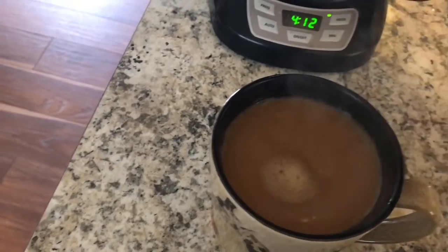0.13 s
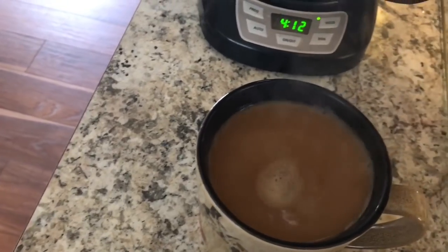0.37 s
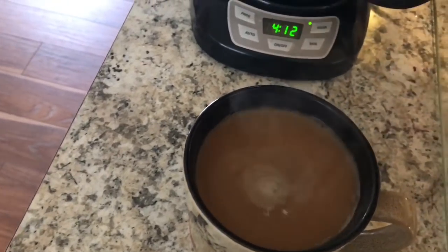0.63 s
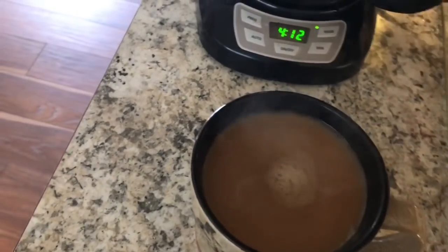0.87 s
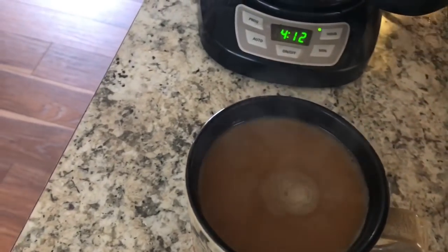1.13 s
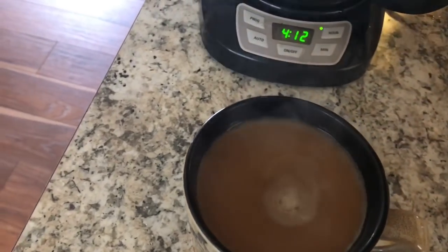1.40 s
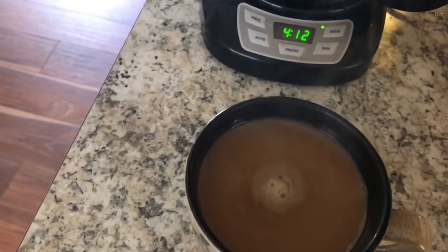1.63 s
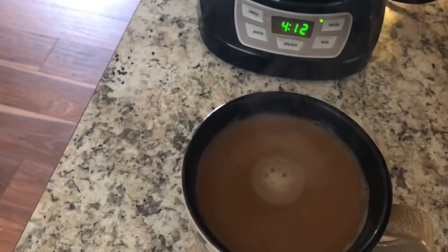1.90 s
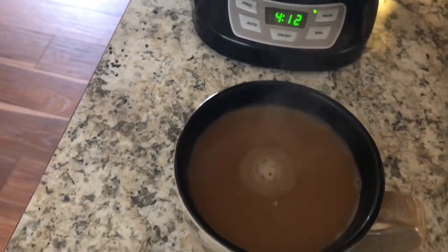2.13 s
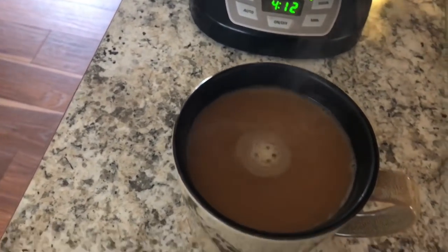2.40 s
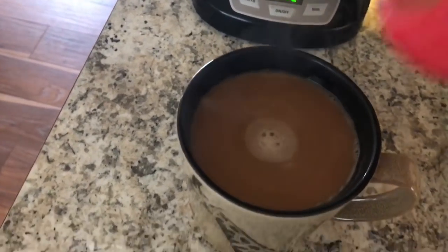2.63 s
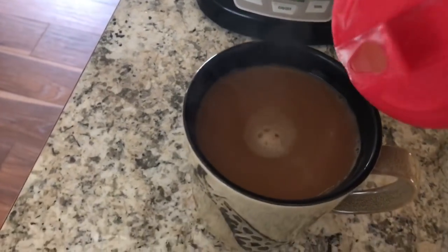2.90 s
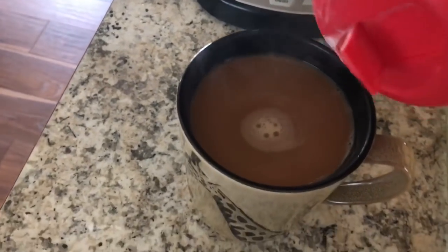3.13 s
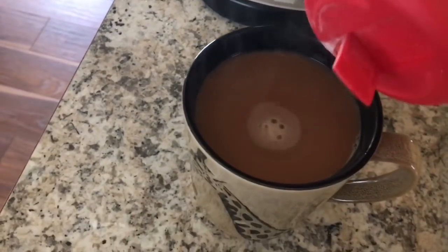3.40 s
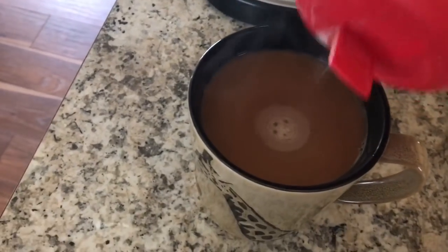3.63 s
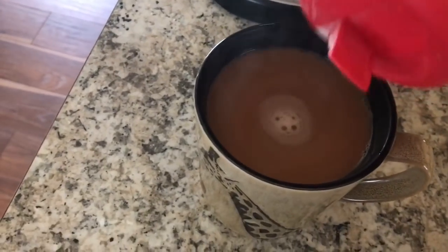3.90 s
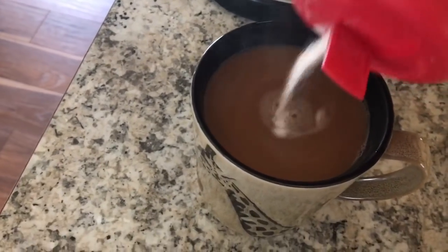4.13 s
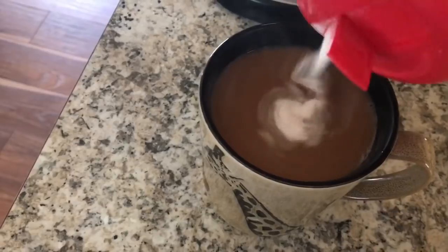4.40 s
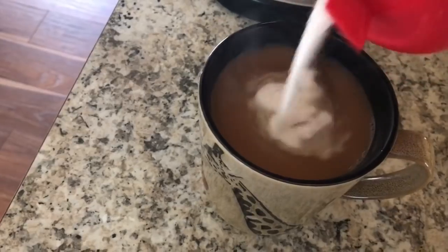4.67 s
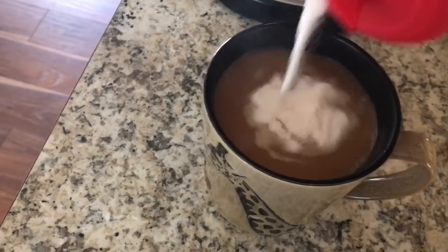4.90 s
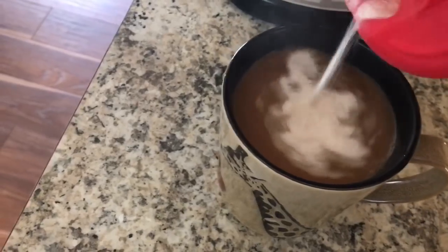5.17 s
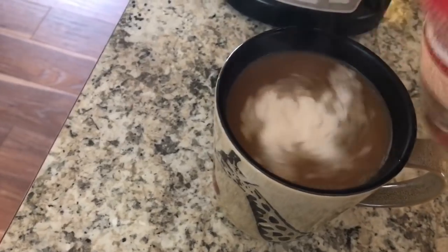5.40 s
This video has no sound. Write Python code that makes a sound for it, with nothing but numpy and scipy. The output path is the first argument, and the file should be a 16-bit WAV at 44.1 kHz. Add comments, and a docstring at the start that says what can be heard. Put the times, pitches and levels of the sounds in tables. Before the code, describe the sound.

A kitchen heard from a phone close to a stone counter, about five and a half seconds. From the start something hot sizzles nearby: a grainy, fine crackle with small wet pops, over a faint, low, slightly wavering appliance hum and soft air rush. At about 0.4 s a metal spoon raps the stone, a hard, very loud clack with a short rattle. At 0.57 s it drops and bounces in quick irregular clacks until about 0.75 s, brighter, with a thin high steel ring dying away shortly after 1 s. The sizzle is fullest from about 1 to 2.8 s, with frequent bubbly pops. Soft dull bumps come through the counter near 1.5, 1.8 and 2.1 s, the middle one strongest. A sharp pop stands out near 3.4 s; then the sizzle is thinner, with brief spurts around 4.7, 5.0 and 5.4 s. A short, faint room echo surrounds it. No speech.

```python
"""On a stone kitchen counter, near a phone, a metal spoon is rapped once, then dropped: it bounces and rings.
Noise bursts shaped by the stone make its blows, decaying sine modes its ring, random impulses its chatter.
Something hot sizzles and pops close by all along: random impulses through resonances, and short rings.
An appliance hums with wavering tones over filtered noise, and three soft bumps come through the counter
as decaying sines with a noise rattle. Faint decaying noise serves as the echo of the room."""
import sys
import numpy as np
from scipy import signal
from scipy.fft import rfft, irfft
from scipy.io import wavfile
from scipy.ndimage import uniform_filter1d

SR = 44100
rng = np.random.default_rng(int(sys.argv[2]) if len(sys.argv) > 2 else 0)


def digitize_waveform(pressure):
    """Quantize a signal to 16-bit integers and store it at the path in sys.argv[1].

    Rows of a 2-D input are taken as channels; values are limited to [-1, 1].
    """
    field = np.atleast_2d(pressure).T
    bounded = np.clip(field, -1, 1)
    quanta = np.round(bounded * 32767).astype(np.int16)
    wavfile.write(sys.argv[1], SR, quanta)


def rack_gain(trim_db):
    """Turn a fader trim in dB into the linear factor to multiply a signal by."""
    fader = np.asarray(trim_db, float)
    return 10 ** (fader / 20)


N = 243873
T = np.arange(N) / SR


def fade(t, t60):
    """Exponential decay: the level falls 60 dB in t60 seconds."""
    return np.exp(-np.log(1000) * t / t60)


def colour(x, points):
    """Minimum-phase filtering through (frequency [Hz], gain [dB]) points, by folding the cepstrum."""
    hz, db = np.transpose(points)
    size = 4096
    bin_hz = np.arange(size // 2 + 1) * SR / size
    gain_db = np.interp(np.log(bin_hz + 1), np.log(hz), db)
    cepstrum = irfft(gain_db * np.log(10) / 20)
    # folding negative times onto positive ones makes the response causal
    cepstrum[1:size // 2] *= 2
    cepstrum[size // 2 + 1:] = 0
    response = irfft(np.exp(rfft(cepstrum)))
    return signal.fftconvolve(x, response)[:len(x)]


def band(x, hz, width):
    """Second-order resonance: its quality factor is the inverse of its relative bandwidth."""
    return signal.lfilter(*signal.iirpeak(min(hz, .4 * SR), 1 / max(width, .05), SR), x)


def unit(x):
    """Normalisation by signal power: scales to rms 1."""
    return x / np.sqrt(np.mean(x ** 2))


def walk(rate):
    """Low-passed noise: random steps at rate [Hz], smoothed twice, with rms 1."""
    k = int(SR / rate)
    steps = np.repeat(rng.standard_normal(N // k + 1), k)
    return unit(uniform_filter1d(uniform_filter1d(steps, k), k)[:N])


def add(out, s, sound):
    """Superposition: adds a sound into out at time s."""
    i = int(s * SR)
    out[i:i + len(sound)] += sound[:len(out) - i]


def appliance():
    """Tonal and broadband machine noise: motor tones waver in level and phase over the rush of air."""
    # motor tones: (frequency [Hz], central rms level [dB])
    motor_tones = [(59.3, -65.5), (88.4, -67), (119.8, -67.5), (177.2, -69.5), (201.8, -62.5)]
    # spectrum of the rushing air: (frequency [Hz], relative gain [dB])
    air_spectrum = [(18, -30.5), (30, -1.5), (59, -5), (127, -12), (145, -5.5), (194, 0), (234, -3),
                    (276, -2), (456, -3.5), (500, -12), (613, -10.5), (855, -21.5), (2500, -21.5),
                    (3250, -29), (5500, -120)]
    tones = 0
    for hz, db in motor_tones:
        level = np.sqrt(2) * rack_gain(db + 1.9 * walk(5.9))
        tones = tones + level * np.sin(2 * np.pi * (hz * T + 0.11 * walk(5)))
    rush = unit(colour(rng.standard_normal(N), air_spectrum))
    return tones + rack_gain(-54.5 + 0.54 * walk(3.2)) * rush


def pop(db, hz):
    """Bubble resonance: a few cycles swell and decay, with a noise tick and a spray of droplets."""
    t = T[:SR // 25]
    ring = np.sin(2 * np.pi * hz * t) * hz * t * fade(t, 5.2 / hz)
    tick = band(rng.standard_normal(len(t)), 1.7 * hz, 1.5) * fade(t, 0.0039)
    droplets = rng.standard_normal(len(t)) * rack_gain(5.8 * rng.standard_normal(len(t)))
    spray = band(droplets, 1.17 * hz, 1.0) * fade(t, 0.045)
    return rack_gain(db) * (ring / np.abs(ring).max() + 0.18 * tick + 0.17 * spray)


def sizzle():
    """Shot noise: random bubble bursts excite resonances of six sizes in flurries, over a fine hiss."""
    # steady strength of the sizzle: (time [s], rms level [dB])
    heat_course = [(0, -49), (.16, -50), (.33, -49), (.95, -46), (1.3, -47.5), (1.6, -50), (2.0, -47),
                   (2.4, -49.5), (2.9, -51), (3.6, -50), (4.2, -51), (4.6, -51), (5.0, -51), (5.3, -51.5),
                   (5.53, -51)]
    # brief flare-ups and dips: (centre time [s], change of level [dB])
    flare_ups = [(.04, 0.5), (.22, -2), (1.15, 2), (1.29, 3.5), (1.43, 1.5), (1.64, 1.5), (1.79, 3),
                 (1.93, 4.5), (2.28, -3), (2.49, 2.5), (2.61, -1), (2.75, 2), (2.93, 2), (3.13, 3),
                 (3.39, 2.5), (3.59, 1.5), (4.13, 3.5), (4.3, 1.5), (4.701, 6), (4.97, 8), (5.12, 5),
                 (5.38, 7)]
    # spectrum of the sizzle: (frequency [Hz], relative gain [dB])
    sizzle_spectrum = [(400, -32), (700, 2.5), (2200, -4.5), (3100, 2), (3600, -1.5), (4280, 1.5),
                       (4950, -8), (5500, -4), (7650, -13), (8450, -11.5), (10400, -20.5), (11500, -16.5),
                       (15600, -22.5), (17000, -28)]
    # louder pops: (time [s], peak level of the ring [dB], ring frequency [Hz])
    loud_pops = [(0.0341, -28.5, 3000), (0.2163, -28.5, 3600), (0.961, -28.5, 2670), (0.9946, -34, 3180),
                 (1.1023, -31, 2540), (1.1467, -34, 3710), (1.1592, -31, 3100), (1.2166, -36, 3240),
                 (1.287, -33, 2810), (1.3713, -33.5, 2530), (1.4314, -35, 3100), (1.5118, -31, 3100),
                 (1.5726, -32.5, 2970), (1.6619, -28.5, 3150), (1.724, -37, 3020), (1.7863, -32, 3100),
                 (1.8327, -30, 2940), (1.9185, -31, 3080), (1.9428, -28.5, 3350), (1.9828, -35, 3220),
                 (2.1532, -33.5, 3800), (2.2563, -33, 3150), (2.275, -29.5, 3280), (2.318, -32, 4260),
                 (2.4007, -30, 3070), (2.4828, -28.5, 3070), (2.607, -29.5, 3670), (2.6568, -28.5, 3370),
                 (2.7427, -31.5, 3140), (2.8134, -30.5, 3170), (3.363, -29.5, 3430), (3.3657, -25, 3080),
                 (3.5893, -33, 4330), (3.6747, -35.5, 4100), (3.8716, -31, 3730), (4.7032, -29, 4290),
                 (4.841, -39, 3920), (5.0398, -32, 3100), (5.1182, -33.5, 4070), (5.3827, -35, 3170),
                 (5.4934, -32, 4050)]
    flare_s = 0.017
    small_pops_per_s, small_pop_hz, small_pop_octaves = 7, 3800, .25
    small_pop_db, small_pop_spread_db = 13.5, 3.5  # mean level over the steady strength, and its spread

    heat_db = np.interp(T, *np.transpose(heat_course))
    level_db = heat_db + sum(db * np.exp(-((T - s) / flare_s) ** 2) for s, db in flare_ups)
    together, crackle = walk(55), 0
    for hz in [1500, 2400, 3700, 5700, 8800, 13500]:
        # flurries are partly common to all sizes, partly each size's own
        flurry = rack_gain(4.5 * together + 2.7 * walk(30))
        size_db = np.minimum(4.2 * rng.exponential(size=N), 14)
        happens = rng.random(N) < 320 * np.sqrt(hz / 3700) * flurry / SR
        bursts = happens * rng.choice([-1, 1], N) * rack_gain(size_db)
        crackle = crackle + band(band(bursts, hz, 0.69), hz, 0.69)
    # each burst throws off a short spatter of droplets
    spatter_power = signal.fftconvolve(crackle ** 2, fade(T[:SR // 50], 0.013))[:N]
    spatter = np.sqrt(np.abs(spatter_power)) * rng.standard_normal(N)
    crackle = unit(crackle) + 0.61 * unit(spatter)
    hiss = 0.39 * rng.standard_normal(N)
    out = unit(colour(unit(crackle) + hiss, sizzle_spectrum))
    # the treble wavers by itself
    treble = signal.sosfilt(signal.butter(2, 6500, "high", fs=SR, output="sos"), out)
    out = (out + treble * (rack_gain(1.0 * walk(11)) - 1)) * rack_gain(level_db)

    for s, db, hz in loud_pops:
        add(out, s, pop(db, hz))
    count = small_pops_per_s * N // SR
    starts = rng.integers(0, N, count)
    for i, (size, pitch) in zip(starts, rng.standard_normal((count, 2))):
        db = heat_db[i] + small_pop_db + small_pop_spread_db * size
        add(out, i / SR, pop(db, small_pop_hz * 2 ** (small_pop_octaves * pitch)))
    return out


def stone_colour(x, tilt_db):
    """Spectral shaping by contact: the stone's colour, tilted by tilt_db per octave above 4 kHz."""
    # spectrum of metal on stone before the tilt: (frequency [Hz], relative gain [dB])
    clatter_spectrum = [(60, -27.5), (140, -25), (230, -3.5), (545, -29.5), (850, -3), (1790, -7),
                        (2300, -2), (3840, 0), (4760, -1.5), (9200, -8.5), (10200, -16), (12500, -24),
                        (15500, -15.5), (17000, -15)]
    return colour(x, [(f, d + tilt_db * max(np.log2(f / 4000), 0)) for f, d in clatter_spectrum])


def blows():
    """Impact noise: each blow is a spray of tiny contacts on the stone, with a modal knock of the counter."""
    # spoon on stone: (time [s], relative level [dB], treble tilt [dB per octave])
    blow_times = [(0.382, -3, 0), (0.3856, 0.5, -4), (0.3915, -8, -6), (0.3986, -7.5, 1),
                  (0.404, -12, -0.5), (0.5713, -6, 5), (0.5741, -2.5, 0.5), (0.5789, -3, 4.5),
                  (0.5822, -4.5, 3.5), (0.5883, -7.5, 1.8), (0.6116, -12, -3.5), (0.6405, -12, -3.5),
                  (0.6565, -7, 6), (0.6756, -5.5, -1.5), (0.684, -12.5, -1), (0.701, -8, -1.5),
                  (0.7094, -13.5, -5), (0.717, -13.5, -0.5), (0.7361, -16.5, -5.5)]
    # knock under each blow: (frequency [Hz], level relative to the blow [dB], t60 [s])
    counter_modes = [(235, -34.5, 0.098), (682, -30, 0.078), (887, -27, 0.09), (1956, -34, 0.054)]
    out, t = np.zeros(N), T[:SR // 2]
    for s, db, tilt_db in blow_times:
        contacts = rng.standard_normal(len(t)) * rack_gain(2.3 * rng.standard_normal(len(t)))
        stone = stone_colour(contacts, tilt_db)
        clack_hz = 4100 * 2 ** (0.15 * tilt_db)  # brighter blows clack higher
        stone = unit(unit(stone) + unit(band(stone, clack_hz, 0.93)))
        add(out, s, rack_gain(db) * stone * fade(t, 0.024) * np.minimum(t / 0.00048, 1))
        knock = sum(rack_gain(db + mode_db) * fade(t, t60) * np.sin(2 * np.pi * hz * t)
                    for hz, mode_db, t60 in counter_modes)
        add(out, s, knock)
    return out


def ringing():
    """Modal vibration: each kick excites the spoon's modes and stifles what rang before."""
    # modes of the steel: (frequency [Hz], relative level [dB], free t60 [s])
    spoon_modes = [(2530, -7, .25), (3820, -6, .22), (4600, -8, .25), (5090, -9, .25), (5861, -4, .5),
                   (5846, 0, .5), (6237, -13, .3), (6490, -10, .2), (8210, -12, .25), (8949, -1, .45),
                   (10810, -4, .33), (10845, -5, .42), (11584, -8, .5), (11830, -15, .2), (12777, -2, .28),
                   (12792, -7, .28), (15200, -13, .16)]
    # kicks on the loose spoon: (time [s], relative level [dB], favoured frequency [Hz],
    # share of the free ring time [ratio])
    spoon_kicks = [(.572, -11, 13000, 0.87), (0.578, -26, 5900, 0.43), (.605, -23, 5900, .9),
                   (.66, -23, 12000, .5), (0.67, -22, 5870, 1), (.684, -23, 5900, .9),
                   (0.706, -24, 10500, 1), (.718, -19.5, 11800, 0.87), (.737, -32.5, 5960, 0.93)]
    fall_db_per_octave = 19  # away from the favoured frequency
    out, t = np.zeros(N), T[:SR // 2]
    # the spoon rocks as it rings, so each mode reaches the phone unevenly
    rocking = [rack_gain(2.7 * walk(44.5)) for _ in spoon_modes]
    for s, kick_db, kick_hz, share in spoon_kicks:
        touches = sum(np.clip((t - later + s) / 0.0025, 0, 1) for later, *_ in spoon_kicks if later > s)
        ring = 0
        for (hz, db, t60), rock in zip(spoon_modes, rocking):
            mode_db = db + kick_db - fall_db_per_octave * abs(np.log2(hz / kick_hz))
            mode = rack_gain(mode_db) * fade(t, t60 * share) * np.sin(2 * np.pi * hz * t)
            ring = ring + mode * rock[int(s * SR):][:len(t)]
        # every later kick takes 5 dB off this ring
        add(out, s, ring * rack_gain(-5.0 * touches) * np.minimum(t / .0015, 1))
    return out


def chatter():
    """Random impulse train: thousands of light uneven touches a second, coloured like the blows."""
    # spells of chatter: (start [s], end [s], level at start [dB], level at end [dB],
    # treble tilt [dB per octave])
    chatter_spells = [(0.383, 0.547, -28.5, -37.5, -3.5), (0.578, 0.622, -31, -26, -2.5),
                      (0.656, 0.76, -23.5, -29, 2)]
    rise_db_per_s, fall_db_per_s = 2499, 455  # slopes before and after each spell
    touches = (rng.random(N) < 2500 * rack_gain(3.0 * walk(150)) / SR) * rng.standard_normal(N)
    out = 0
    for start, end, start_db, end_db, tilt_db in chatter_spells:
        db = np.interp(T, [start, end], [start_db, end_db])
        db = db - rise_db_per_s * np.maximum(start - T, 0) - fall_db_per_s * np.maximum(T - end, 0)
        out = out + rack_gain(db) * unit(stone_colour(touches, tilt_db))
    return out


def bumps():
    """Damped oscillation: a dull knock through the counter, with a soft noise rattle from 12 ms earlier."""
    # soft bumps: (time [s], knock level [dB], knock frequency [Hz], knock t60 [s], rattle level [dB])
    soft_bumps = [(1.49, -37.5, 187, 0.087, -38), (1.8114, -28.5, 222, 0.059, -32),
                  (2.081, -35, 215, 0.056, -52)]
    out, t = np.zeros(N), T[:SR // 4]
    for s, db, hz, t60, rattle_db in soft_bumps:
        knock = np.sin(2 * np.pi * hz * t) * fade(t, t60) * np.minimum(t / 0.0028, 1)
        add(out, s, -rack_gain(db) * knock)
        rattle = unit(band(band(rng.standard_normal(len(t)), 1030, 2.7), 900, 2.7))
        envelope = np.minimum(t / 0.015, 1) ** 1.7 * fade(np.maximum(t - .012, 0), 0.015)
        add(out, s - .012, rack_gain(rattle_db) * rattle * envelope)
    return out


def kitchen(x):
    """Diffuse reverberation: convolution with noise bands, each with its own exponential decay."""
    # echo bands: (centre frequency [Hz], t60 [s], relative level before the frequency weight [dB])
    echo_bands = [(176, 0.3, 2.5), (500, 0.3, 6.5), (1490, 0.47, 4.5), (3380, 0.55, -3.5),
                  (6700, 0.47, -5.5), (13100, 0.18, 5)]
    t, tail = T[:SR], 0
    for hz, t60, db in echo_bands:
        noise = unit(band(band(rng.standard_normal(SR), hz, 0.92), hz, 0.92))
        tail = tail + rack_gain(db) * noise * fade(t, t60) * np.sqrt(hz / 3500)
    return signal.fftconvolve(x, tail * np.minimum(t / 0.0037, 1))[:N]


def scene():
    """Linear superposition: direct sounds, their echo and the appliance add up."""
    hum = appliance()
    hot = sizzle()
    struck = blows() + ringing() + chatter() + bumps()
    echo = kitchen(rack_gain(-47) * struck + rack_gain(-51) * hot)
    return (struck + hot + echo + hum)[None]


def band_limit(x):
    """A steep low-pass at the top of the band."""
    return signal.sosfilt(signal.butter(12, 16650, fs=SR, output="sos"), x)


def record(dry):
    """Saturation and band limiting: the phone rounds the loudest peaks and cuts deep bass and top."""
    low_cut = signal.butter(8, 43, "high", fs=SR, output="sos")
    top_cut = signal.ellip(12, .5, 45, 15680, fs=SR, output="sos")
    rounded = np.tanh(1.172 * dry) / 1.263
    mix = signal.sosfilt(np.vstack([low_cut, top_cut]), rounded)
    return band_limit(mix)


dry = scene()
out = record(dry)
digitize_waveform(out)
```